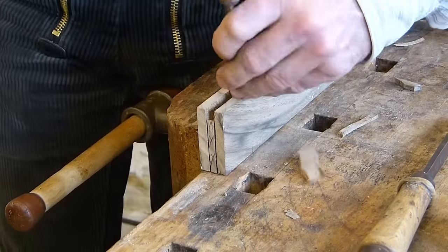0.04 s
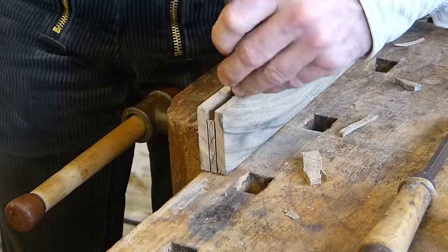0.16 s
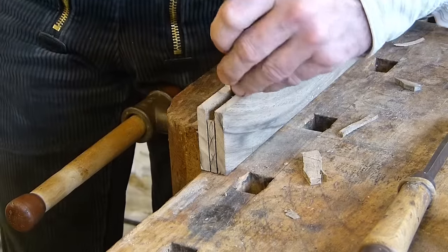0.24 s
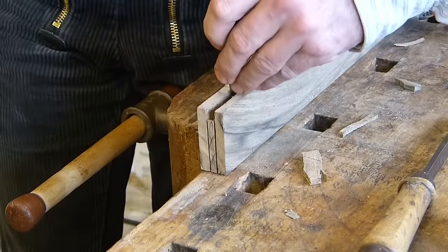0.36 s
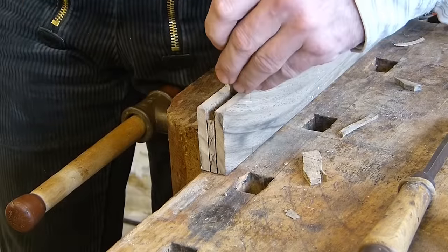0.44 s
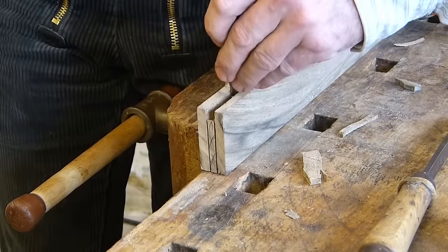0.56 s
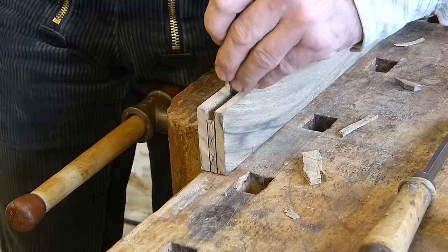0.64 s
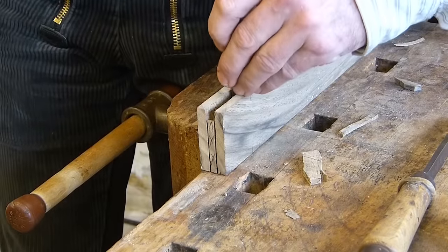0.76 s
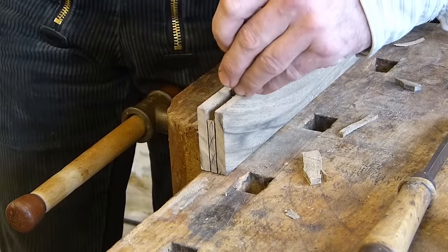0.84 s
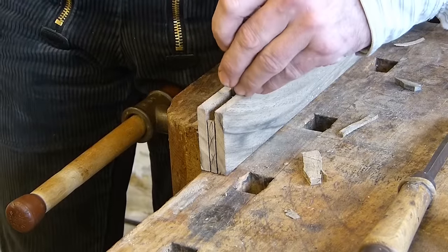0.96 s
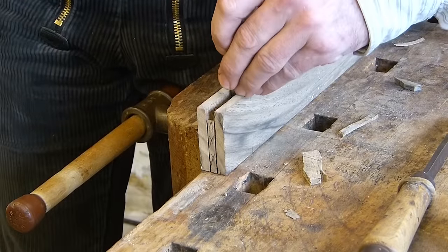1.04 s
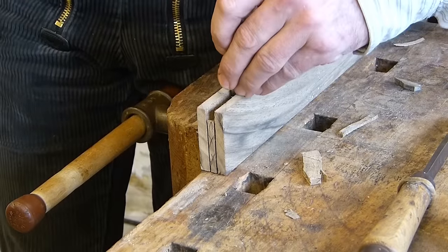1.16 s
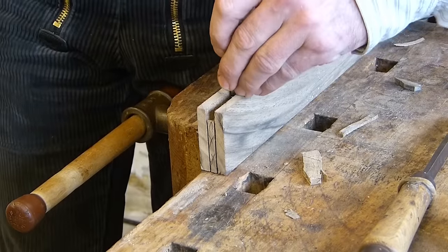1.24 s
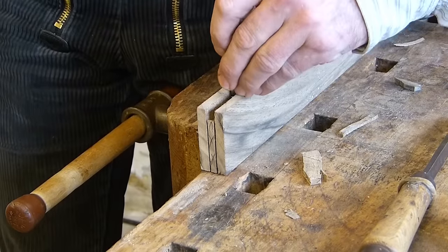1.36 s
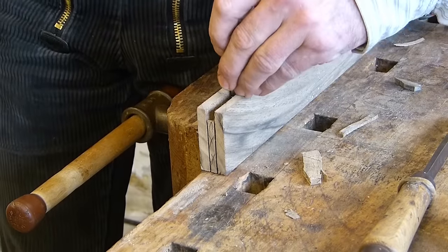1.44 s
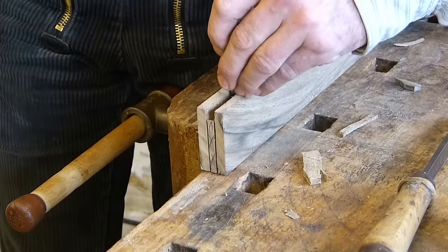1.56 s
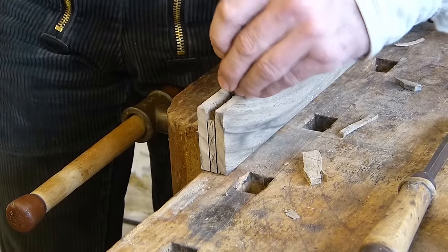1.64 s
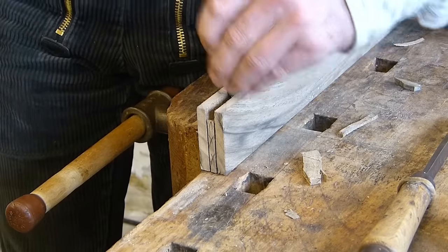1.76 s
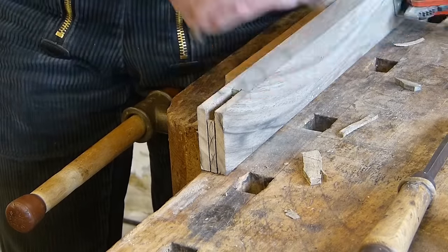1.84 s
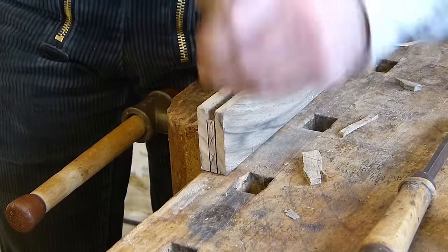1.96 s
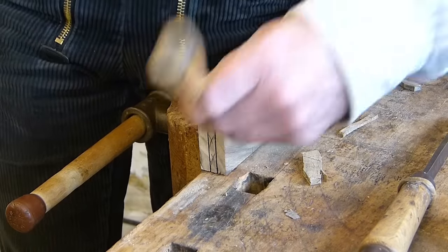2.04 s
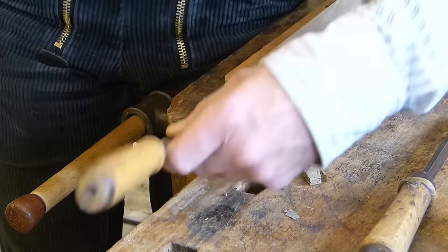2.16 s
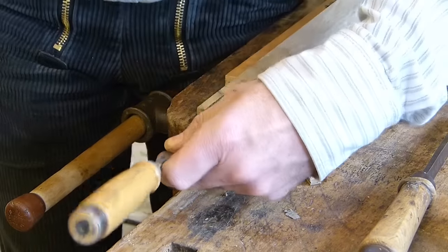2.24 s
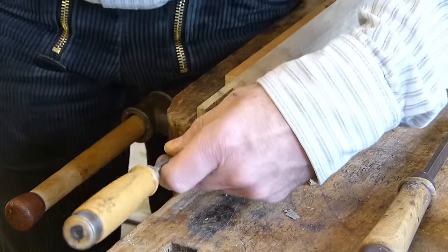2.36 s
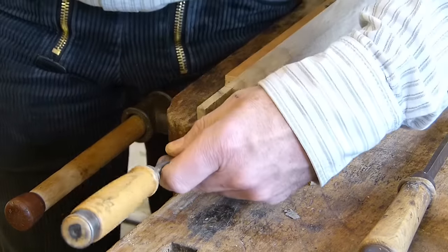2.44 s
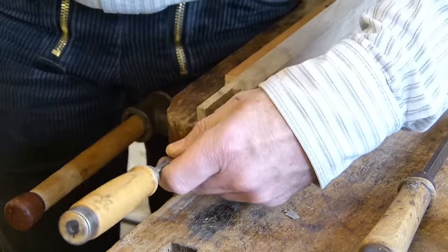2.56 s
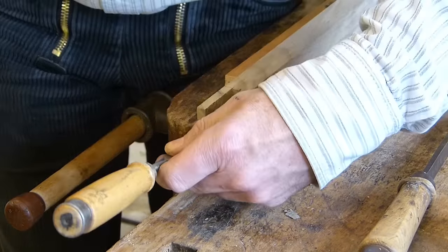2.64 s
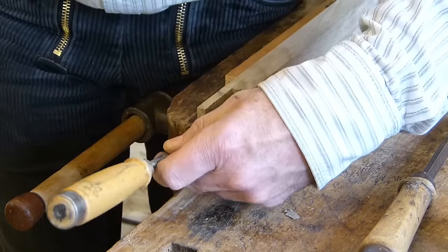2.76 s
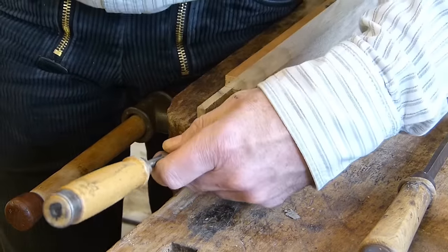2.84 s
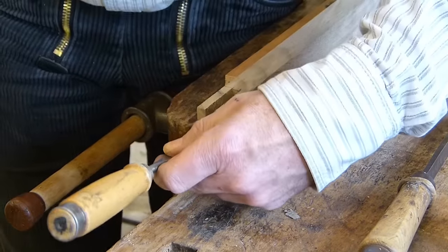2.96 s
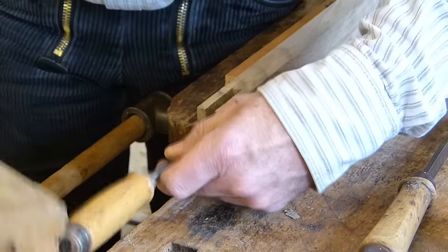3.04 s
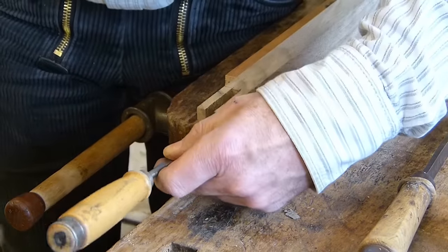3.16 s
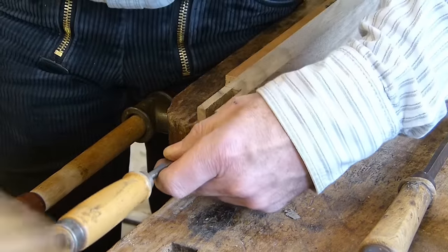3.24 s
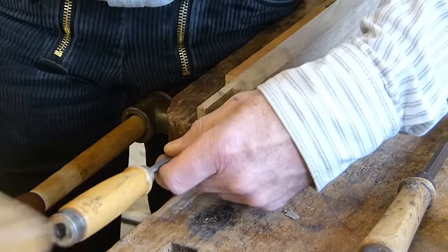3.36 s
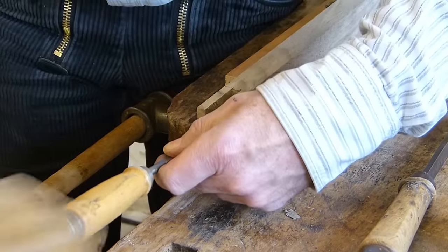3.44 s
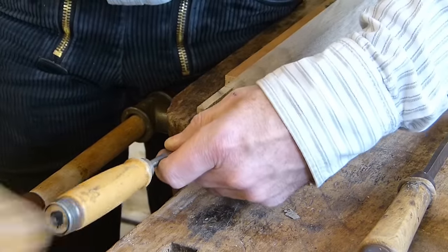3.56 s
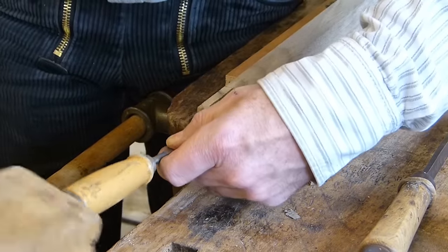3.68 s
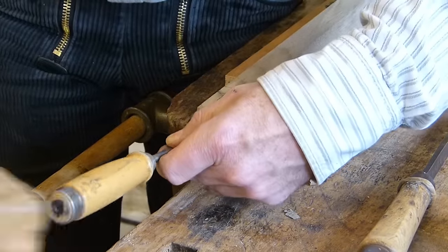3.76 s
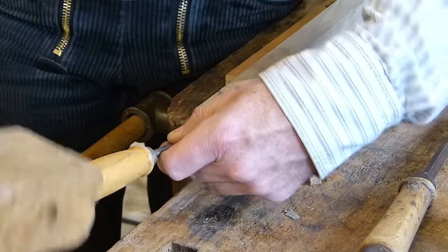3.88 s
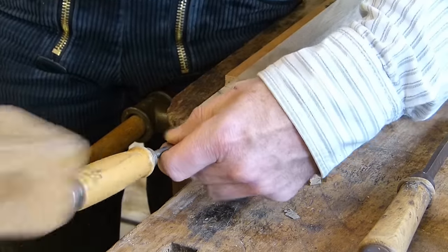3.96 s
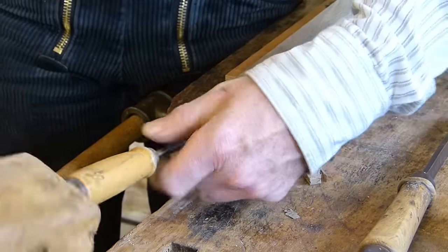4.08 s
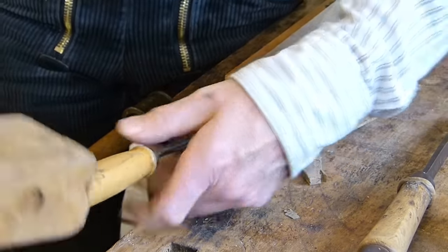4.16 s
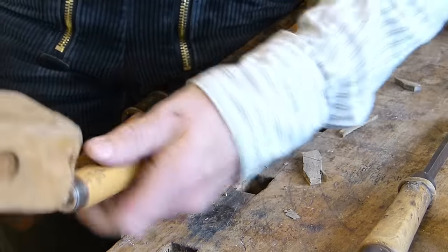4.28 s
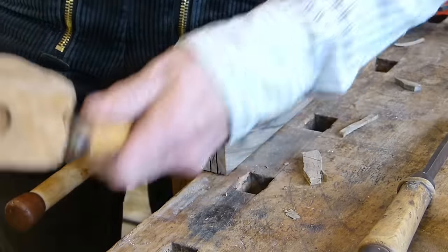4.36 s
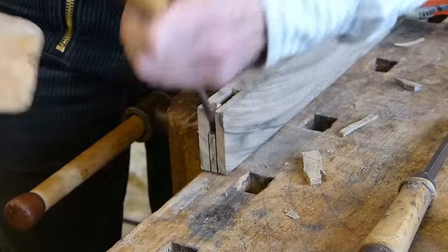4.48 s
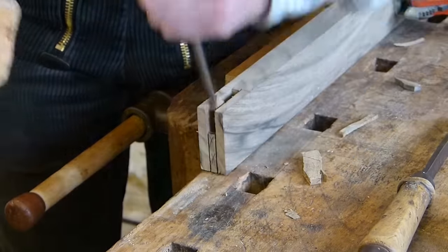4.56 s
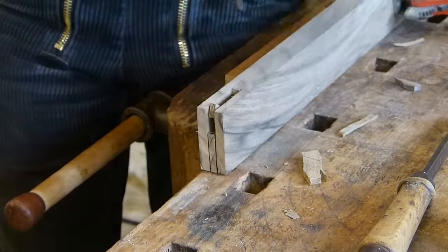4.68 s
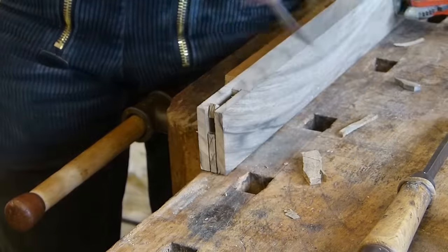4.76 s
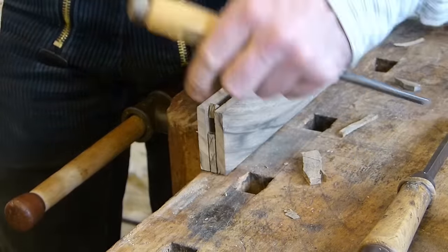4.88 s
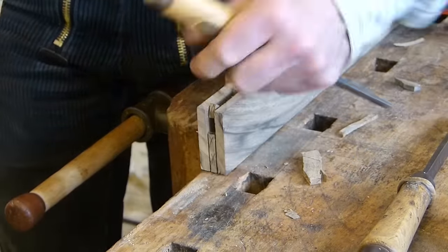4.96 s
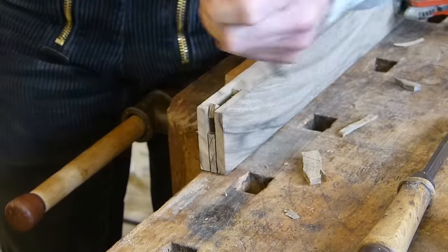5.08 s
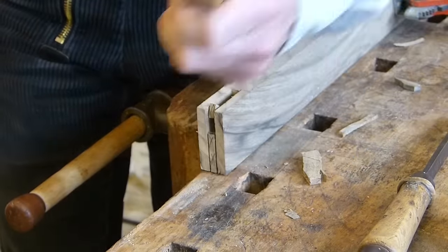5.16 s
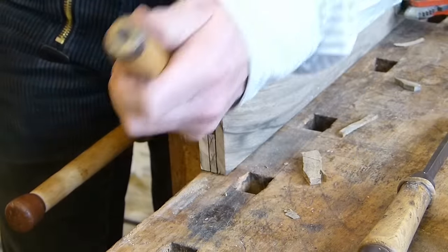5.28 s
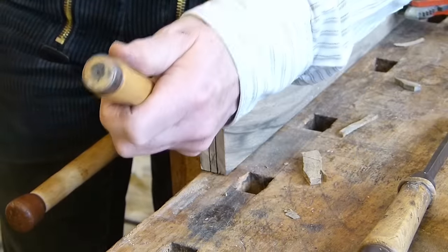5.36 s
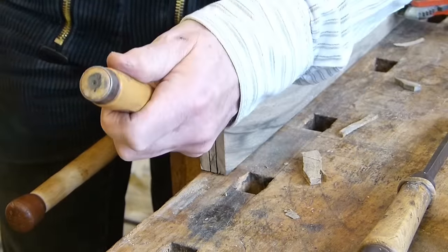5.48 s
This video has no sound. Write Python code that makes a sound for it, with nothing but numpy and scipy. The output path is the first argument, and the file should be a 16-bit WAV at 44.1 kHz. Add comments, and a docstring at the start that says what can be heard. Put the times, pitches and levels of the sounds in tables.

```python
"""Tools clatter on a bench in a live workshop; a hand brushes the wood under a quiet hiss.
A wooden mallet drives a chisel into a clamped board with five blows from above, then, after
a faint ticking, six from the end: filtered clicks knock, noise bursts crack, dying sines boom.
Steel and wood clatter again, light brushes follow and a soft bump ends it.
The microphone stands close: its peaks saturate on the blows, and decaying noise is the room."""
import sys
import numpy as np
from scipy import signal
from scipy.fft import rfft, irfft
from scipy.io import wavfile

SR = 44100
rng = np.random.default_rng(int(sys.argv[2]) if len(sys.argv) > 2 else 0)


def int16_out(signal):
    """Quantize to a 16-bit WAV file."""
    q = np.round(np.clip(np.atleast_2d(signal).T, -1, 1) * 32767)
    wavfile.write(sys.argv[1], SR, q.astype(np.int16))


N = 243502
SIZE = 4096  # samples in a click or burst
HZ, AGE = np.fft.rfftfreq(SIZE, 1 / SR), np.arange(SIZE) / SR
TURN_S = 2.6  # the chisel is driven from above before this time, from the end of the board after it

# mallet blows: [t/s, knock level/dB, board f/Hz, handle f/Hz, crack level/dB, crack brightness/dB,
# bench boom level/dB]
MALLET_BLOWS = [(0.7696, 8, 1210, 1580, 3, 4, 6), (1.0569, 11, 1140, 1610, 4.5, -1.5, 1.5),
                (1.297, 9, 920, 1553, 6, -6.5, -1.5), (1.5094, 10.5, 750, 1784, 7, -1.5, -0.5),
                (1.6994, 7, 1076, 1974, -5, -10.5, 4), (3.1167, 7.5, 1087, 1700, 3.5, -1, 2.5),
                (3.3493, 8, 950, 1586, 7.5, 2.5, 0), (3.5386, 8.5, 872, 2180, 7, 10.5, -7.5),
                (3.7294, 8, 875, 1360, 5.5, -2, -4.5), (3.9019, 9, 1010, 1905, 0, 1.5, -3.5),
                (4.1314, 6, 1090, 1363, 1.3, 1, 5)]
# spectrum of a wooden knock: [f/Hz, level/dB per Hz]
WOOD_SPECTRUM = [(30, -25), (90, -31), (160, -11), (300, -9.5), (380, -3.5), (520, -2), (900, -0.5),
                 (1700, 0), (2600, -3), (4000, -14.5), (8000, -16), (16000, -53)]


def amp(db):
    """Decibels to gain."""
    return 10 ** (np.asarray(db) / 20)


def unit(x):
    """Scales a sound to energy 1."""
    return x / np.sqrt(np.sum(x ** 2, axis=-1, keepdims=True) + 1e-20)


def read(points, hz):
    """Reads a table on a log-frequency axis."""
    f, value = np.transpose(points)
    return np.interp(np.log(hz + 1), np.log(f + 1), value)


def add(mix, s, sound):
    """Adds a mono or stereo sound at time s."""
    part = mix[:, max(round(s * SR), 0):][:, :sound.shape[-1]]
    part += sound[..., :part.shape[1]]


def hump(hz, octaves):
    """A bell of height 1 around hz."""
    return np.exp(-.5 * (np.log2((HZ + 1) / hz) / octaves) ** 2)


def click(db):
    """The causal minimum-phase click that has this spectrum in dB, at energy 1."""
    log_gain = np.log(amp(np.r_[db, db[-2:0:-1]]))
    return unit(np.fft.ifft(np.exp(np.conj(signal.hilbert(log_gain)))).real)


def burst(db, decay):
    """A spray of tiny fractures or contacts that dies quickly, coloured by a spectrum."""
    attack = 1 - np.exp(-AGE / 0.00088)
    grains = rng.standard_normal(SIZE) * np.exp(-AGE / decay) * attack
    return unit(signal.fftconvolve(grains, click(db))[:SIZE])


def ring(modes, rise, scatter_db, apart=0.024):
    """Dying sines of energy 1 per side, shared out anew each time; higher modes differ more in phase."""
    t = np.arange(int(1.5 * SR)) / SR
    hz, db, t60 = np.transpose(modes)
    size, step = rng.standard_normal((2, len(hz)))
    side_turns = np.outer([1, -1], apart * step * np.minimum((hz / 300) ** 2, 1))
    turns = rng.random(len(hz)) + side_turns
    waves = np.exp(np.outer(2j * np.pi * hz - np.log(1000) / t60, t)) * (1 - np.exp(-t / rise))
    level = amp(db + scatter_db * size) / np.linalg.norm(waves, axis=1)
    return unit(((level * np.exp(2j * np.pi * turns)) @ waves).real)


def air():
    """The quiet hiss of the room: steady shaped noise, the same in both channels."""
    # hiss spectrum: [f/Hz, level/dB per Hz]
    hiss_spectrum = [(20, 2), (60, 1.5), (130, 8.5), (200, 6.5), (300, 4.5), (600, 3), (1500, 0),
                     (3000, -7), (7000, -6), (12000, -13), (16000, -30)]
    shape = amp(read(hiss_spectrum, np.fft.rfftfreq(N, 1 / SR)))
    hiss = unit(irfft(rfft(rng.standard_normal(N)) * shape, N)) * np.sqrt(N)
    return amp(-68) * np.array([hiss, hiss])


def workshop(sound, early_db, build=0.0042, bend=1.252):
    """Quick reflections off the bench top, then the diffuse room tail, which fades ever faster."""
    # fading of the room: [f/Hz, t60/s]
    room_fading = [(120, 0.28), (320, 0.61), (840, 0.45), (2200, 0.42), (5800, 0.38), (9000, .3),
                   (14000, .2)]
    # left-right likeness of the tail: [f/Hz, likeness/0 to 1]
    room_likeness = [(100, 0.98), (200, 0.78), (350, 0.18), (700, 0.18), (1500, .7), (5500, 0.8),
                     (10000, 0.54)]
    echo_s, echo_db, echo_spread_s = 0.016, 0.5, 0.003  # the nearest walls answer in one cluster
    t = np.arange(28672) / SR
    hz, frames, (a, b) = signal.stft(rng.standard_normal((2, len(t))), SR, nperseg=256)
    same = np.clip(read(room_likeness, hz), -1, 1)[:, None]
    mid, side = np.sqrt((1 + same) / 2) * a, np.sqrt((1 - same) / 2) * b
    fading = amp(-60 * (frames / read(room_fading, hz)[:, None]) ** bend)
    tail = signal.istft(np.array([mid + side, mid - side]) * fading, SR, nperseg=256)[1]
    early = 1 + amp(early_db) * np.exp(-t / 0.011)
    response = unit(tail * (1 - np.exp(-t / build))) * early
    walls = amp(echo_db * np.exp(-.5 * ((t - echo_s) / echo_spread_s) ** 2))
    return signal.fftconvolve(sound[None], response * walls, axes=1)


def faint_ticking(db=-39):
    """A very faint, uneven ticking, opposite in the two channels, while the chisel is lined up."""
    from_s, to_s, ticks_per_s = 2.23, 3.1, 16.5
    out = np.zeros((2, N))
    for s in np.arange(from_s, to_s, 1 / ticks_per_s):
        colour = 25 * hump(1100, 1.3) + 8 * hump(1680, 0.039)
        tick = burst(colour, decay=.011)
        late, size_db = rng.uniform(-.012, .012), rng.normal(0, 2)  # s, dB
        add(out, s + late, amp(db + size_db) * np.outer([2, -.6], tick))
    return out


def earlier_blows(s):
    """How many blows of the same run have already driven the edge in."""
    return sum(t < s and (t < TURN_S) == (s < TURN_S) for t, *_ in MALLET_BLOWS)


def sleeve():
    """Cloth hisses softly as the arm swings into the first blow of each run: noise in a smooth swell."""
    above_db, end_db = -25, -29.5  # energy of the swish in each direction
    lead_s, width_s = 0.015, 0.064  # how long before the blow it peaks, and its Gaussian width
    t = np.arange(N) / SR
    motion = np.zeros(N)
    for s, *_ in MALLET_BLOWS:
        if earlier_blows(s) == 0:
            swing = unit(np.exp(-.5 * ((t - s + lead_s) / width_s) ** 2))
            motion += amp(above_db if s < TURN_S else end_db) * swing
    cloth = signal.oaconvolve(rng.standard_normal(N), click(30 * hump(5800, 1.1)))[:N]
    return motion * cloth


def handling():
    """Fingers and blade brush the wood in short noise bursts; at last the hand settles with a soft bump."""
    # light brushes of hand and blade: [t/s, level/dB, centre f/Hz]
    wood_brushes = [(0.406, -23, 4400), (2.257, -40.5, 4500), (2.409, -31, 4450), (5.148, -39, 3500),
                    (5.421, -29, 4800), (5.469, -29.5, 1116)]
    soft_bump_s = 5.464
    out = np.zeros((2, N))
    for s, db, hz in wood_brushes:
        brush = amp(db) * burst(30 * hump(hz, 1.4), decay=0.026)
        add(out, s, amp(-2.5) * brush)
        add(out, s, workshop(brush, early_db=-15))
    bump = amp(-21.0) * burst(40 * hump(235, 1.16), decay=0.037)
    add(out, soft_bump_s, workshop(bump, early_db=6.0))  # heard through the room only
    return out


def chisel(ripple_db, size=45):
    """The chisel's resonances in dB; grip and contact point change them at every hit."""
    # short resonances of the chisel in its handle: [f/Hz, width/octaves, level/dB]
    handle_resonances = [(1280, 0.049, 0), (1870, 0.089, 1.5), (2580, 0.11, 0), (2890, 0.054, 1.5),
                         (3500, .05, -0.5), (3840, 0.026, 1.5), (4045, 0.052, 3), (7300, 0.013, 4)]
    resonances = sum(db * hump(hz, octaves) for hz, octaves, db in handle_resonances)
    ripple = np.convolve(rng.standard_normal(len(HZ)), unit(np.hanning(size)), "same")
    return resonances + ripple_db * ripple * np.minimum(HZ / 2000, 1)


def clatter():
    """Steel and wood knock on the bench: a bright clink, a ringing blade and a light thud."""
    # knocks of steel and wood on the bench: [t/s, wood level/dB, steel level/dB, bench boom level/dB, top f of
    # the steel/Hz]
    bench_knocks = [(0.002, -19.5, -31.5, -4.5, 1600), (0.0369, -10.5, -20, -15, 5100),
                    (0.1309, -16, -15.5, -15, 9800), (4.4285, -6, 4.5, -12.5, 11400),
                    (4.455, -2, 6.5, -13.5, 12000), (4.5344, -9, 7.5, -16.5, 11070),
                    (4.6507, -11, -10, -2.5, 8700)]
    # spectrum of a steel clink: [f/Hz, level/dB per Hz]
    steel_spectrum = [(500, -39.5), (1500, -19), (2600, -10.5), (4200, -9.5), (5500, -3), (7000, -2.5),
                      (8700, -1), (10000, -8.5), (12000, -13), (16000, -23.5)]
    # ringing of the blade: [f/Hz, level/dB, t60/s]
    blade_modes = [(3880, -3.5, .35), (5550, -1.5, 0.283), (6240, 0.5, 0.33), (6600, 3, .28),
                   (7125, -2.5, .28), (7560, -1.5, .28), (8100, -3, 0.22), (8495, -5, 0.33),
                   (8900, -3.5, .3), (9000, -1, .25), (9860, -3.5, 0.18)]
    # bench top under a light knock: [f/Hz, level/dB, t60/s]
    bench_top_modes = [(139, -16, 0.303), (183, -19, 2.2), (195, -5, 0.57), (249, -10.5, 0.2),
                       (280, -1, 0.16), (315.2, -12, 0.25), (410, -14, 0.28)]
    direct_db = 5.5  # gain of the direct sound: all the knocks sound from about the same distance
    out = np.zeros((2, N))
    for s, wood_db, steel_db, boom_db, top_hz in bench_knocks:
        dulling_db = 10 * np.log10(1 + np.minimum(HZ / top_hz, 1.8) ** 12)
        tool = 1.3 * chisel(ripple_db=1.6) - dulling_db
        wood = read(WOOD_SPECTRUM, HZ) + tool - 5 * hump(600, 0.11)
        steel = read(steel_spectrum, HZ) + tool
        wood_contact = amp(wood_db - 7.5) * burst(wood, decay=0.0011)
        steel_contact = amp(steel_db) * burst(steel, decay=0.00047)
        add(out, s, amp(direct_db) * (wood_contact + steel_contact))
        add(out, s, workshop(amp(wood_db - 1.5) * click(wood), early_db=10.5))
        add(out, s, workshop(amp(steel_db) * click(steel), early_db=8.0))
        blade = [(hz, db - 10 * np.log10(1 + (hz / top_hz) ** 20), t60) for hz, db, t60 in blade_modes]
        add(out, s, amp(steel_db - 5.5) * ring(blade, rise=.0005, scatter_db=5.5))
        add(out, s, amp(boom_db) * ring(bench_top_modes, rise=0.0053, scatter_db=1.5))
    return out


def bench(s):
    """The heavy bench swells into low modes set by the blow's direction; the room blurs part of the boom."""
    # bench modes: [f/Hz, t60/s, level struck from above/dB, level struck from the end/dB]
    bench_modes = [(129, 0.43, -10, -20.5), (165, .2, -8.5, -17), (178.2, 2.2, -6.5, -24),
                   (182.1, 0.31, -9, -2), (197.7, 0.82, -8.5, 0.5), (227, 0.1, -9, -15),
                   (261, 0.56, -6, -13.5), (281.7, 0.53, -7.5, -21.5), (296, 0.078, -8.5, -11),
                   (413, .35, -17, -6.5), (402, 2.8, -23, -34.5), (482, 0.42, -10.5, -4.5)]
    modes = [(hz, above if s < TURN_S else end, t60) for hz, t60, above, end in bench_modes]
    boom = amp(-1) * ring(modes, rise=.004, scatter_db=2.5)
    add(boom, 0, workshop(amp(-7) * click(40 * hump(260, 1)), early_db=3))
    return boom


def snap_level(s, crack_db):
    """The first contact in dB: sharpest from above and on a clean cut, duller as the slot deepens."""
    fresh_db = 5 if s < TURN_S else -6  # first blow of a run, for a crack of 0 dB
    per_crack, fall_db_per_blow = 1.6, 3.54  # grows with the crack, is muffled as the edge sinks in
    return fresh_db + per_crack * crack_db - fall_db_per_blow * earlier_blows(s)


def chopping():
    """The mallet hits the handle and rebounds; board and handle knock, the edge cracks through fibres."""
    # spectrum of parting fibres: [f/Hz, level/dB per Hz]
    fibre_spectrum = [(500, -25.5), (2000, -4.5), (3000, 2.5), (4000, 1), (4600, 0), (6500, -4.5),
                      (8300, -5.5), (10500, -10.5), (13000, -31.5), (16000, -35)]
    # ringing of the clamped board and vice: [f/Hz, level/dB, t60/s]
    board_modes = [(534, -2.5, 0.15), (717, -1.5, 0.37), (942, 2.5, 0.29), (1118, -4.5, 0.21),
                   (1210, -1.5, 0.57), (1536, 1, 0.43), (2180, -27, 2.4), (2310, -5.5, 0.45),
                   (2970, -4.5, .3), (4130, -12.5, 0.42)]
    rebound = 0.5  # second contact of handle and mallet, as a share of the blow
    grain_above_db, grain_end_db = -1.5, 2  # the board's body answers more to blows along the grain
    out = np.zeros((2, N))
    for s, knock_db, board_hz, handle_hz, crack_db, bright_db, boom_db in MALLET_BLOWS:
        tool = chisel(ripple_db=1.6)
        grain = (grain_above_db if s < TURN_S else grain_end_db) * hump(850, .35)
        pitches = 4 * hump(board_hz, 0.13) + 5.5 * hump(handle_hz, 0.18)
        knock = amp(knock_db) * click(read(WOOD_SPECTRUM, HZ) + tool + grain + pitches)
        # the handle springs back against the mallet about two of its periods later
        spring_s = rng.uniform(.9, 1.2) * 2 / handle_hz
        again = np.interp(AGE - spring_s, AGE, knock, left=0)
        fibres = read(fibre_spectrum, HZ) + tool + bright_db * hump(8000, 0.2)
        crack = amp(crack_db) * burst(fibres, decay=0.00083)
        snap = amp(snap_level(s, crack_db)) * burst(40 * hump(6100, 1.1), decay=0.0017)
        add(out, s, amp(2.5) * (knock + rebound * again) + amp(3.5) * crack + snap)
        add(out, s, workshop(amp(-1.0) * knock, early_db=1.5))
        add(out, s, workshop(amp(crack_db) * click(fibres), early_db=-0.5))
        add(out, s, amp(knock_db - 7) * ring(board_modes, rise=0.0011, scatter_db=4))
        add(out, s, amp(boom_db) * bench(s))
    return out


def scene():
    """Everything at the bench, from the room's hiss to the mallet."""
    return air() + faint_ticking() + sleeve() + handling() + clatter() + chopping()


def record(dry, notch_hz=4420, notch_width_hz=260):
    """The microphone has a narrow dip in the treble; the peaks of the blows saturate; then the band limit."""
    notched = signal.lfilter(*signal.iirnotch(notch_hz, notch_hz / notch_width_hz, SR), dry)
    heard = dry + 0.26 * (notched - dry)  # a partial dip
    squashed = heard / (1 + heard ** 4) ** .25
    band_limit = signal.firwin(255, 16200, window=("kaiser", 8), fs=SR)  # low-pass, Hz
    return signal.oaconvolve(squashed, band_limit[None], "same")


dry = scene()
out = record(dry)
int16_out(out)
```